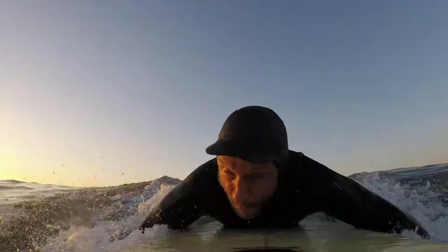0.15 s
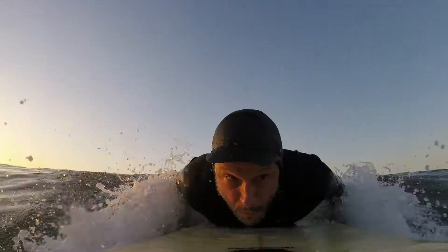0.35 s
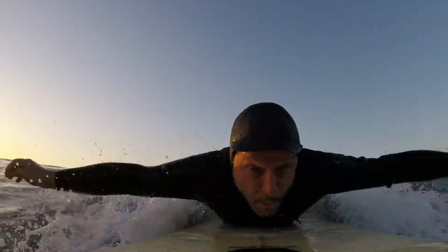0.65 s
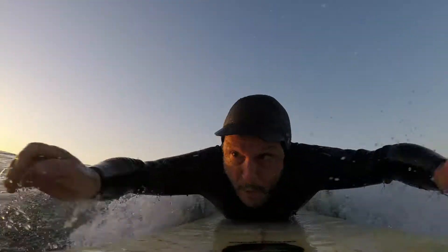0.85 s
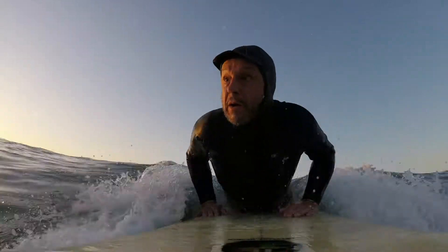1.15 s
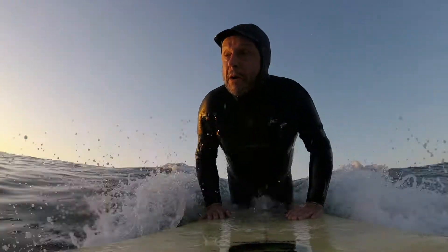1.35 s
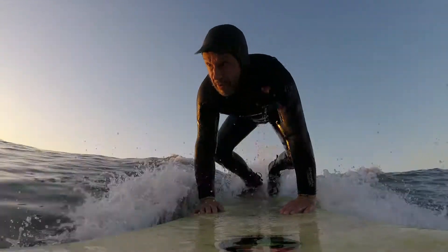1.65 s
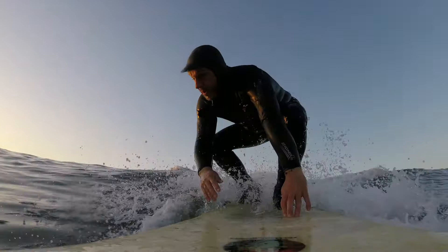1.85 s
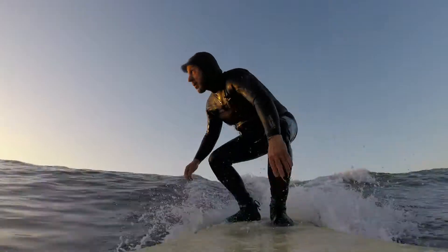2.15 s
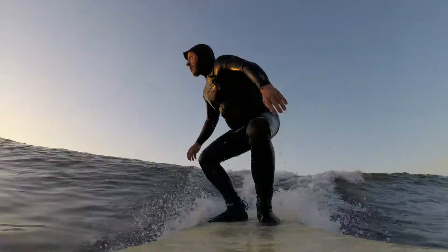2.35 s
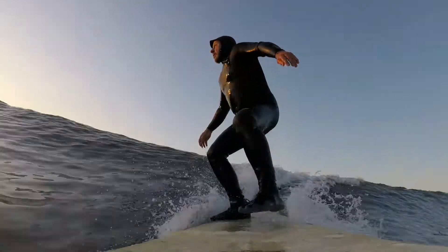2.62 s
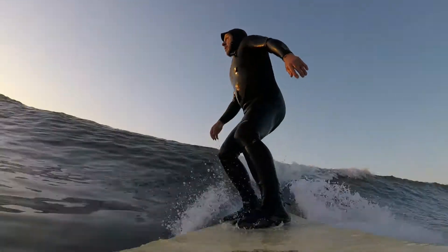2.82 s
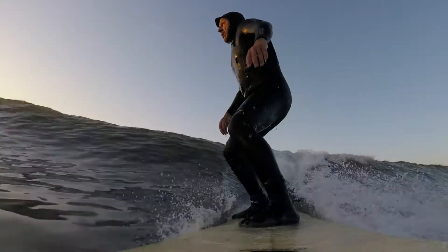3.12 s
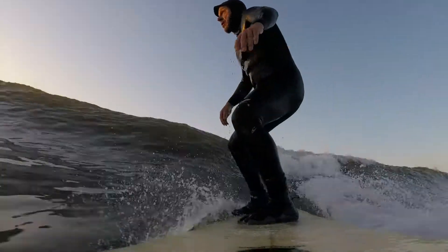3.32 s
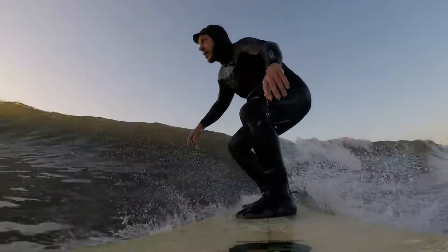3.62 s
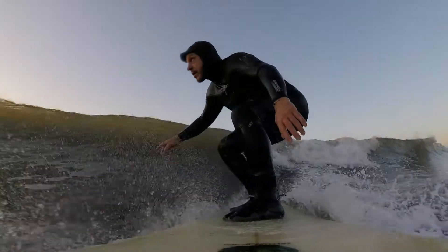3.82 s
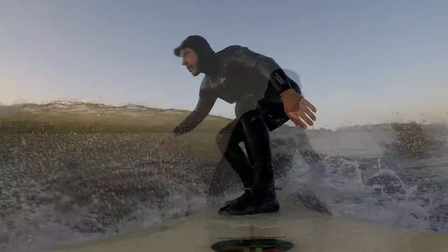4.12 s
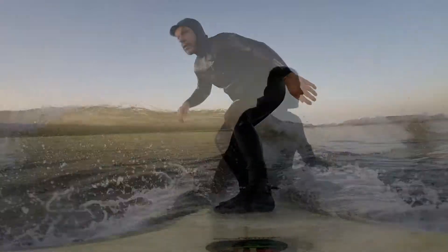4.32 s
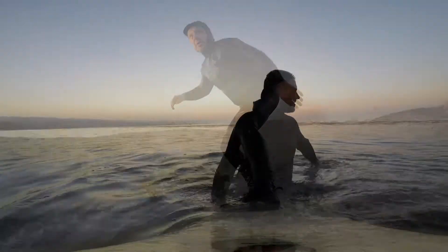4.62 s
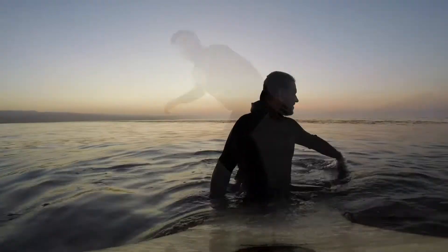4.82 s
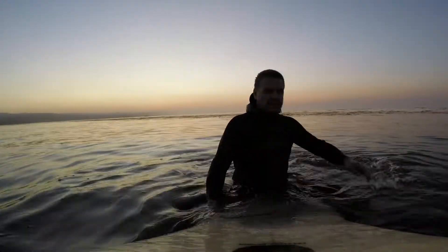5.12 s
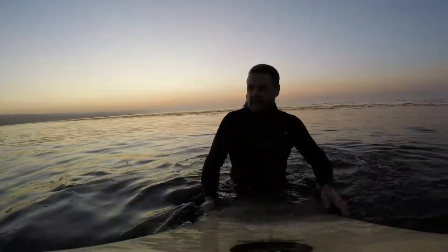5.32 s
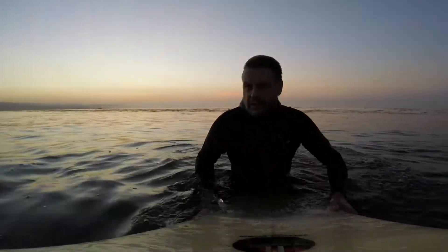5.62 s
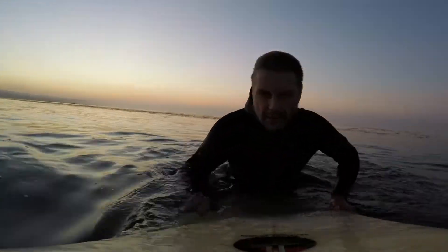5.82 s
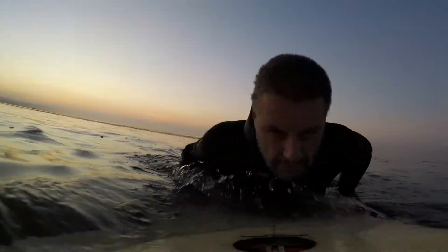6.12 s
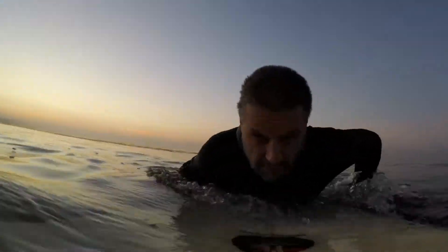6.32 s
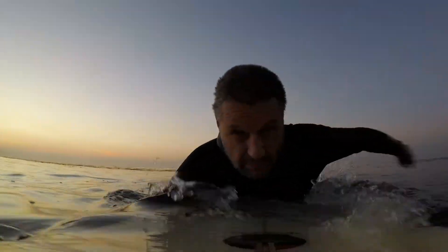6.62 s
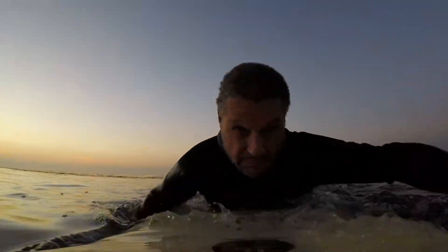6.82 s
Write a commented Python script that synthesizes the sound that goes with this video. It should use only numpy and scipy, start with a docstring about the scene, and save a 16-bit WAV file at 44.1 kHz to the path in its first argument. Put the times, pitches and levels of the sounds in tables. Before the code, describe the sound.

From 0 to about 4.2 seconds, water booms and drums under a fast surfboard, a dense, low, unevenly surging rumble with fine spray hissing above it. Around 0.3 a brief stroke, slap and sharp drop ticks stand out; wind gusts thump the microphone, strongest near 1.6 and 2.0, with another near 4.0. A harder slap lands at 2.25. From 4.2 to 4.9 the roar falls away, leaving near quiet with treble suddenly muffled by a water film. Soft slaps come at 5.1 and 5.2, then a faint sizzle and tiny ringing drops whose tone climbs until about 5.9. From 5.45 to 5.85 hollow knocks, churning and low glugs cluster. After a short lull, strong thumps at 6.1 open a brighter, choppy stretch; strokes at 6.25 and 6.4 splash and gurgle, and lapping, trickling and small bubbles continue to the end near 7.

```python
"""Water drums and booms on a planing surfboard while spray hisses and gusts buffet a microphone on its nose.
The ride fades into calm water, where ripples slap the hollow board and strokes churn, splash and gurgle.
Random impacts through coloured filters give water and spray; damped modes give the hull; gliding sines
give the air pockets. A water film on the microphone port adds a moving resonance, muffles the treble
while it seals the port, rings with drops, then drains."""
import sys
import numpy as np
from scipy import signal
from scipy.fft import rfft, irfft
from scipy.io import wavfile
from scipy.ndimage import uniform_filter1d

SR = 44100
rng = np.random.default_rng(int(sys.argv[2]) if len(sys.argv) > 2 else 0)


def to_wav(s):
    """Save 16-bit WAV."""
    ch = np.atleast_2d(s).T  # columns
    pcm = np.round(np.clip(ch, -1, 1) * 32767)  # PCM
    wavfile.write(sys.argv[1], SR, pcm.astype(np.int16))


N = 306936
T = np.arange(N) / SR  # time [s]

# planing on the wave: time_s, boom_db, drumming_db, spray_db
RIDE_LEVELS = [(0.0, -13.5, -13.5, -30), (0.19, -19, -24.5, -29.5), (0.31, -14, -13.5, -27.5),
               (0.48, -12.5, -18, -31), (1.0, -15, -18, -28.5), (1.25, -10.5, -16, -29),
               (1.52, -15, -18, -31), (2.0, -13.81, -15.5, -30), (2.4, -13.5, -17, -32.5),
               (2.62, -11.5, -17.5, -34), (2.86, -17, -20, -32.5), (3.1, -15, -17, -30.5),
               (3.75, -14, -15.5, -27), (4.15, -16.5, -18.34, -29), (4.5, -19.5, -20.5, -29.5),
               (4.75, -26.91, -28.5, -36.65), (4.87, -39, -38.5, -39.5), (4.96, -37, -45, -48)]
# spectrum of the hull boom: frequency_hz, gain_db
BOOM_SPECTRUM = [(30, -24), (60, -2), (95, 2), (150, -1), (200, -5.5), (280, -19), (600, -44.5),
                 (2000, -85)]
# spectrum of water drumming on the hull: frequency_hz, gain_db
DRUMMING_SPECTRUM = [(80, -49), (180, -1.5), (240, -0.5), (290, -3), (350, 2), (450, -3), (570, -3.5),
                     (680, -10), (900, -18), (1300, -28.5), (2500, -47), (6000, -92)]
# spectrum of the spray: frequency_hz, gain_db
SPRAY_SPECTRUM = [(250, -7.5), (900, 9.5), (1800, 5), (3000, 0.5), (4200, -3.5), (5900, -5), (6400, 2),
                  (7900, -2), (9000, 6), (9900, -11), (11000, -24.5), (12100, -40), (15000, -29),
                  (16000, -14)]
# spectrum of the wind, shared by the low swell of calm water: frequency_hz, gain_db
WIND_SPECTRUM = [(10, -3.5), (25, -4), (45, 0.5), (65, -3.5), (100, -8.5), (250, -36.5), (1000, -87)]
# gusts on the microphone: centre_s, rise_db over the steady wind
GUST_TABLE = [(0.41, 4), (0.6, 5), (0.821, 4), (1.25, 3), (1.6, 9), (2.03, 8), (2.66, 2), (2.98, 5),
              (3.96, 6), (4.62, 0)]
# spectrum of the electronic hiss: frequency_hz, gain_db
MIC_HISS_SPECTRUM = [(1000, 0), (3500, 7), (4700, -17), (6300, 3), (9000, 0.5), (12000, -3), (15000, -17),
                     (16000, -18)]
# resonance of the water film, set by its thickness: time_s, pitch_hz
FILM_PITCH = [(4.85, 3860), (5.3, 4400), (5.38, 5200), (5.48, 5250), (5.6, 5800), (5.87, 6580),
              (5.95, 6200), (5.99, 5210), (6.2, 4020), (6.96, 3920)]
# jolts that set the film swinging: time_s, swing_hz
FILM_JOLTS = [(0.46, 200), (1.72, 350), (2.04, 720), (2.24, 650), (2.64, 200), (3.03, 300), (4.6, 200),
              (6.38, 650)]
# treble lost through the sealed port: time_s, loss_db (negative is a lift)
SEAL_LOSS = [(4.6, -0.5), (4.9, 6.5), (4.97, 24), (5.9, 1.5), (6.08, 7), (6.115, -7.5)]
# modes of the hollow board: frequency_hz, t60_s, level_db
HULL_MODES = [(90.4, 0.31, 0), (120.4, 0.29, 0), (159.4, 0.17, 1), (225, 0.074, -0.5), (286, 0.043, -0.5),
              (355, 0.043, -2.5), (437, 0.1, -0.5), (590, 0.025, -15), (690, 0.039, -2), (930, 0.02, -8),
              (1430, 0.028, -20), (1780, 0.02, -15), (2160, 0.021, -18)]
# hands and arms churning water: start_s, rise_s, length_s, strength_db, splash_db
STROKE_TABLE = [(0.276, 0.043, 0.086, -16, -30), (5.514, .02, .05, -21.5, -31.5),
                (5.578, .025, 0.11, -9.5, -25), (5.776, 0.0099, .066, -16, -27),
                (6.259, .02, 0.05, -10, -39), (6.398, 0.046, 0.13, -7.5, -21.5)]
# spectrum of a splash: frequency_hz, gain_db
SPLASH_SPECTRUM = [(150, -33), (500, 7), (1000, 5.5), (1300, -8), (1850, 7.5), (2300, -4), (2900, -19.5),
                   (4500, -24), (9000, -33), (12000, -57)]
# drops landing near the port: start_s, peak_db, pitch_hz, decay_s
DROP_TABLE = [(0.305, -9.5, 8900, 0.0041), (0.35, -14.5, 9000, 0.0056), (1.988, -15, 9100, .005),
              (2.971, -13, 9500, 0.0005), (6.116, -14.5, 10000, 0.00099), (6.223, -14, 3300, 0.0015),
              (6.262, -19.5, 8500, 0.00079), (6.125, -18.5, 3900, 0.0022), (6.391, -14, 9500, 0.0012),
              (6.414, -20, 9800, 0.0019), (6.4795, -19.5, 3200, 0.0046), (6.6215, -22, 9400, .0015)]
# spectrum of foam and of a drop's tick: frequency_hz, gain_db
FOAM_SPECTRUM = [(250, -19), (900, 7.5), (1800, 3), (3000, 7), (4200, -5), (5900, -5.5), (6400, 2),
                 (7900, -2.5), (9400, 5), (10200, -11), (11000, -21), (12100, -34), (14700, -20),
                 (16000, -43)]
# ripples and chop slapping the hull: start_s, thump_db, crack_db, decay_s of the crack
SLAP_TABLE = [(0.352, -12, -13.5, .006), (2.256, -9, -14, 0.0028), (5.099, -14, -17.5, 0.0016),
              (5.225, -13.5, -10.5, 0.0067), (5.272, -27, -21, 0.0035), (5.457, -12.5, -14.5, 0.02),
              (5.473, -6.5, -12.5, 0.0084), (5.58, -7, -15, 0.0056), (5.679, -12.5, -19, 0.0036),
              (5.776, -9, -35, .008), (5.836, -12, -43, 0.02), (6.096, -5, -13, 0.0096),
              (6.135, -5, -34, 0.045), (6.264, -10, -28, 0.009), (6.306, -9, -21, .003),
              (6.397, -19, -16, 0.0037), (6.518, -6.5, -28, .008), (6.596, -24, -21, .003)]
# calm water: time_s, swell_db, lapping_db, fizz_db
CALM_LEVELS = [(4.87, -41, -38, -56), (5.15, -33.5, -30, -50), (5.7, -31.5, -35, -59),
               (5.83, -19, -38, -68), (5.97, -31, -37, -51), (6.11, -20.5, -33.5, -47.5),
               (6.46, -23.5, -23.5, -39), (6.66, -38, -27, -47), (6.96, -26.5, -26.5, -42.5)]
# spectrum of lapping water: frequency_hz, gain_db
LAPPING_SPECTRUM = [(30, -7.5), (120, 15), (220, 9.5), (450, 6), (900, -4.5), (1400, -5), (2200, -9.5),
                    (3000, -18), (4200, -28.5), (8000, -48), (14000, -68)]
# drops landing on the water film: start_s, peak_db
PING_TABLE = [(5.4311, -39), (5.541, -24.5), (5.5842, -32), (5.625, -32), (5.679, -20), (5.755, -16),
              (5.86, -29), (5.985, -15), (6.0611, -36)]
# trapped air pockets: start_s, pitch_hz, level_db, length_s, rise (share of the pitch, per length)
GLUG_TABLE = [(5.612, 376, -7, 0.043, 0.19), (5.675, 1014, -19.5, 0.02, -0.051),
              (5.743, 430, -18.5, 0.013, 0.02), (5.677, 383, -7.5, 0.015, 0.11),
              (5.771, 615, -20, 0.013, -0.005), (6.125, 198, -12, 0.035, -0.064),
              (6.225, 1920, -24.5, 0.0072, .1), (6.327, 314, -11.5, 0.013, 0.089),
              (6.351, 420, -18.5, .025, -0.022), (6.445, 358, -11, 0.053, -0.075),
              (6.591, 700, -18, 0.012, -0.21), (6.674, 694, -24, 0.0078, 0.17),
              (6.701, 459, -15.5, 0.021, 0.032), (6.755, 2200, -29, .007, .1)]

WIND_DB, WIND_END_S, WIND_FADE_S = -21, 5.05, 0.65  # steady wind, dying away as the ride ends
GUST_S = 0.078  # time scale on which a gust swells and drops
MIC_HISS_DB = -61.5
SWING_HZ, SWING_S = 9, 0.047  # rate of the film's swing, and its time to build and to settle
STROKE_RELEASE_S, SPLASH_SAG_DB_PER_S = 0.016, 81  # the splash sags from the start of the stroke
# fine drops on the film
SIZZLE_S, SIZZLE_RISE_S, SIZZLE_LENGTH_S, SIZZLE_RELEASE_S, SIZZLE_DB = 5.345, 0.22, 0.62, 0.07, -47
EDGE_HZ = 15700  # upper band limit


def amp(db):
    """Decibels to amplitude ratio."""
    return 10 ** (np.asarray(db) / 20)


def evened(x):
    """Normalisation to unit root-mean-square level."""
    return x / np.sqrt(np.mean(x ** 2) + 1e-20)


def peaked(x):
    """Normalisation to unit peak."""
    return x / abs(x).max()


def steady(x, seconds):
    """Automatic levelling: unit power over the given time, with the faster grain kept."""
    power = abs(uniform_filter1d(x ** 2, max(int(seconds * SR), 2)))
    return x / np.sqrt(power + 1e-12)


def read(points, hz):
    """Interpolation of a spectrum on a logarithmic frequency axis."""
    frequency, value = np.transpose(points)
    return np.interp(np.log(hz + 1), np.log(frequency), value)


def levels(rows, fade=0.01):
    """Gain curves interpolated in decibels, fading out beyond the table's ends."""
    s, *columns = np.transpose(rows)
    inside = np.clip(1 + np.minimum(T - s[0], s[-1] - T) / fade, 0, 1)
    return [inside * amp(np.interp(T, s, column)) for column in columns]


def envelope(start, rise, length, release):
    """Linear rise, hold until the length is over, then exponential decay."""
    t = T - start
    decay = np.exp(-np.maximum(t - length, 0) / release)
    return np.clip(t / rise, 0, 1) * decay


def add(mix, s, sound):
    """Superposition: lay a sound into the mix from time s."""
    part = mix[max(round(s * SR), 0):][:len(sound)]
    part += sound[:len(part)]


def colour(x, points):
    """Minimum-phase filtering: the log gain's Hilbert transform supplies the causal phase."""
    log_gain = np.log(amp(read(points, abs(np.fft.fftfreq(8192, 1 / SR)))))
    response = np.exp(np.conj(signal.hilbert(log_gain)))
    taps = np.fft.ifft(response).real[:4096]
    return signal.oaconvolve(x, taps)[:len(x)]


def flutter(rate_hz, depth_db):
    """Random amplitude modulation: low-passed noise, in decibels, drives a gain."""
    hz = np.fft.rfftfreq(N, 1 / SR)
    slow = rfft(rng.standard_normal(N)) / (1 + (hz / rate_hz) ** 4)
    return amp(depth_db * evened(irfft(slow, N)))


def patter(per_s, spread_db):
    """Shot noise: random impacts of either sign, most small and a few large."""
    size = amp(spread_db * np.minimum(rng.exponential(1, N), 5))
    sign = rng.choice([-1, 1], N)
    return evened(size * sign * (rng.random(N) < per_s / SR))


def burst(decay):
    """Exponentially damped noise."""
    t = T[:SR // 8]
    return rng.standard_normal(len(t)) * np.exp(-t / decay)


def resonate(x, hz, width):
    """Heterodyne resonance: shift the moving pitch to zero, low-pass, and shift back."""
    turn = np.exp(2j * np.pi * np.cumsum(hz) / SR)
    r = np.exp(-np.pi * width / SR)
    return 2 * (turn * signal.lfilter([1 - r], [1, -r], x / turn + 1e-18)).real


def bubbles(per_s, low_hz, high_hz, cycles, spread_db, count=28):
    """Bubble resonance: a cloud from the start of calm water, each a damped sine of rising pitch."""
    out = np.zeros(N)
    for hz in np.geomspace(low_hz, high_hz, count) * rng.uniform(0.97, 1.03, count):
        u = np.arange(0, 6, hz / (cycles * SR))  # time in decay lengths
        decay = (1 - np.exp(-u / 0.15)) * np.exp(-u)
        ring = decay * np.sin(2 * np.pi * cycles * (u + 0.025 * u ** 2))
        size = amp(spread_db * np.minimum(rng.exponential(1, 200), 3.5))
        starts = np.cumsum(rng.exponential(count / per_s, 200)) + CALM_LEVELS[0][0]
        for s, gain in zip(starts, size):
            if s < T[-1]:
                add(out, s, gain * ring)
    return out


def hull(push, lowest_hz=70):
    """Modal synthesis: the board's damped modes answer a push; deep bass does not radiate."""
    t = T[:SR // 3]
    ring = np.zeros(len(t))
    for k, (hz, t60, db) in enumerate(HULL_MODES):
        ring += (-1) ** k * amp(db - 60 * t / t60) * np.sin(2 * np.pi * hz * t)
    ring = signal.sosfilt(signal.butter(2, lowest_hz, "highpass", fs=SR, output="sos"), ring)
    return signal.oaconvolve(push, ring)[:len(push)]


def ride():
    """Impact noise: chop booms and drums in uneven surges, and spray falls as countless drops."""
    boom_gain, drumming_gain, spray_gain = levels(RIDE_LEVELS, fade=0.03)
    boom = steady(colour(patter(900, 2.3), BOOM_SPECTRUM), 0.071) * flutter(8.6, 0.8)
    chop = patter(3000, 1.7) * flutter(34, 1.3)
    drumming = steady(colour(chop, DRUMMING_SPECTRUM), 0.084) * flutter(14.6, 1.65)
    grains = patter(7000, 2.77) + 0.91 * rng.standard_normal(N)
    spray = evened(colour(grains * flutter(24, 1.0), SPRAY_SPECTRUM))
    return boom_gain * boom + drumming_gain * drumming + spray_gain * spray


def wind():
    """Turbulent pressure: low-weighted noise from the headwind swells in gusts."""
    gust_db = sum(db * np.exp(-((T - s) / GUST_S) ** 2) for s, db in GUST_TABLE)
    fade = np.clip((WIND_END_S - T) / WIND_FADE_S, 0, 1)
    noise = steady(colour(rng.standard_normal(N), WIND_SPECTRUM), 0.1)
    return amp(WIND_DB + gust_db) * fade * noise


def mic_hiss():
    """Electronic noise: a faint, stationary hiss."""
    return amp(MIC_HISS_DB) * evened(colour(rng.standard_normal(N), MIC_HISS_SPECTRUM))


def film_pitch():
    """Film resonance: slow change with thickness, plus a quick swing round each jolt."""
    swings = np.zeros(N)
    for s, hz in FILM_JOLTS:
        swings += hz * np.cos(2 * np.pi * SWING_HZ * (T - s)) * np.exp(-abs(T - s) / SWING_S)
    return np.interp(T, *np.transpose(FILM_PITCH)) + swings


def wet_port(x, peak_db=6.0, notch_db=17, corner_hz=3200, wobble_db=0.12):
    """Resonance and cancellation: the trembling film lifts its pitch, notches above, and blocks treble."""
    hz, t, z = signal.stft(x, SR, nperseg=384, noverlap=288)
    pitch = np.interp(t, T, film_pitch() * flutter(21, wobble_db))
    ratio = hz[:, None] / pitch
    lift = peak_db * np.exp(-((ratio - 0.98) / 0.08) ** 2)
    above = ratio - 1.1
    notch = notch_db * np.exp(-(above / np.where(above < 0, 0.06, 0.13)) ** 2)  # steep lower side
    treble = (1 + np.tanh((hz[:, None] - corner_hz) / 500)) / 2
    loss = np.interp(t, *np.transpose(SEAL_LOSS)) * treble
    return signal.istft(z * amp(lift - notch - loss), SR, nperseg=384, noverlap=288)[1][:N]


def strokes(blow_s=0.00061):
    """Forced vibration: churned water knocks the hull, which rings on, and gurgles and splashes."""
    strength, splash = np.zeros((2, N))
    for s, rise, length, strength_db, splash_db in STROKE_TABLE:
        pull = envelope(s, rise, length, STROKE_RELEASE_S)
        strength += pull * amp(strength_db)
        splash += pull * amp(splash_db - SPLASH_SAG_DB_PER_S * np.maximum(T - s, 0))
    # soft blows favour the low modes
    blows = signal.lfilter([1], [1, -np.exp(-1 / (blow_s * SR))], patter(1200, 1.1))
    answer = np.sqrt(abs(uniform_filter1d(hull(blows) ** 2, 1500)) + 1e-9)
    knocks = hull(strength * blows / answer)  # levelled before the push, so the hull can ring on
    gurgle = steady(bubbles(300, 231, 734, cycles=4.6, spread_db=3.0), 0.09)
    spatter = steady(colour(patter(2500, 3.2), SPLASH_SPECTRUM), 0.036)
    plinks = steady(bubbles(500, 900, 2350, cycles=10, spread_db=2.5), 0.032)
    churn = amp(-3.5) * knocks + amp(-9.0) * strength * gurgle
    return churn + splash * (spatter + amp(-4.5) * plinks)


def drops():
    """Resonant impact: single large drops tick near the port, each with its own pitch."""
    out = np.zeros(N)
    for s, db, hz, decay in DROP_TABLE:
        tick = colour(burst(decay), FOAM_SPECTRUM)
        ring = resonate(tick, np.full(len(tick), hz), 2200)
        add(out, s, amp(db) * peaked(0.27 * tick + ring))
    return out


def slaps():
    """Impulse response: each ripple pushes the hull once and bursts into a short splash."""
    out = np.zeros(N)
    t = T[:SR // 3]
    for s, thump_db, crack_db, decay in SLAP_TABLE:
        push = np.exp(-t / (0.1 * decay))
        add(out, s, amp(thump_db) * peaked(hull(push)))
        add(out, s, amp(crack_db) * peaked(colour(burst(decay), SPLASH_SPECTRUM)))
    return out


def calm():
    """Impact noise and bubble resonance: small waves lap and trickle round the board, and foam fizzes."""
    swell_gain, lapping_gain, fizz_gain = levels(CALM_LEVELS, fade=0.14)
    swell = steady(colour(rng.standard_normal(N), WIND_SPECTRUM), 0.15)
    laps = steady(colour(patter(2500, 3.7) + 0.54 * rng.standard_normal(N), LAPPING_SPECTRUM), 0.35)
    trickle = steady(bubbles(500, 624, 3020, cycles=4.7, spread_db=4), 0.36)
    foam = steady(colour(patter(1800, 5.2) + 0.5 * rng.standard_normal(N), FOAM_SPECTRUM), 0.23)
    beads = steady(bubbles(500, 3200, 9400, cycles=5.0, spread_db=2.5), 0.3)
    lapping = laps + amp(-7.5) * trickle
    fizz = foam + amp(-6.5) * beads
    return swell_gain * swell + lapping_gain * lapping + fizz_gain * fizz


def film_rings():
    """Excited resonance: drops on the water film, in spurts and singly, ring it at its own pitch."""
    pitch = film_pitch()
    sizzle = patter(500, 4.5)
    for width_hz in (1100, 1400, 1800, 2400):
        sizzle = resonate(sizzle, pitch, width_hz)
    spurts = flutter(30, 4)
    shape = envelope(SIZZLE_S, SIZZLE_RISE_S, SIZZLE_LENGTH_S, SIZZLE_RELEASE_S)
    out = amp(SIZZLE_DB) * shape * steady(sizzle * spurts, 0.15)
    t = T[:SR // 20]
    decay = (1 - np.exp(-t / 0.0002)) * np.exp(-t / 0.0017)
    for s, db in PING_TABLE:
        ring = decay * np.sin(2 * np.pi * np.interp(s, T, pitch) * t)
        add(out, s, amp(db) * peaked(ring))
    return out


def glugs():
    """Cavity resonance: trapped air pockets ring and glide in pitch as they change shape."""
    out = np.zeros(N)
    for s, hz, db, length, rise in GLUG_TABLE:
        u = np.arange(0, 2, 1 / (length * SR))  # time in lengths
        swell = (1 - np.exp(-u / 0.12)) / (1 + u ** 8)
        add(out, s, amp(db) * swell * np.sin(2 * np.pi * hz * length * (u + rise * u ** 2 / 2)))
    return out


def scene():
    """Superposition: water and wind pass the wet port; film rings and electronic hiss are added."""
    outside = ride() + wind() + strokes() + drops() + slaps() + calm() + glugs()
    return (wet_port(outside) + film_rings() + mic_hiss())[None]


def record(dry):
    """Soft saturation rounds off the loudest peaks; a linear-phase low-pass then limits the band."""
    rounded = dry / (1 + (dry / 0.95) ** 8) ** (1 / 8)
    lowpass = signal.firwin(511, EDGE_HZ, window=("kaiser", 9), fs=SR)
    return signal.oaconvolve(rounded, lowpass[None], "same")


dry = scene()
out = record(dry)
to_wav(out)
```